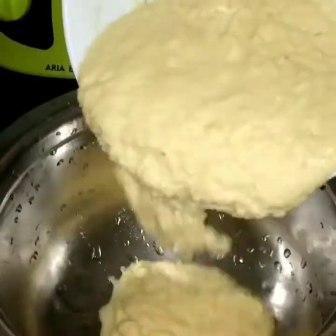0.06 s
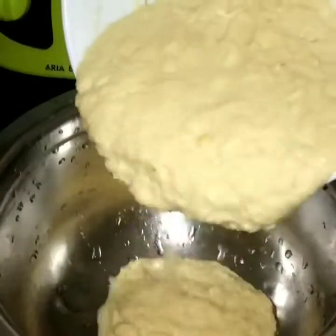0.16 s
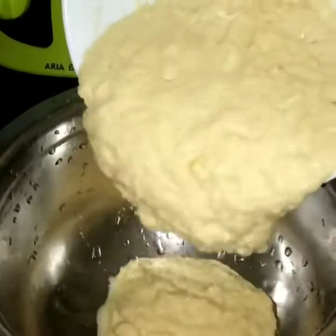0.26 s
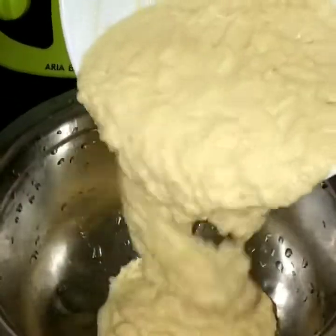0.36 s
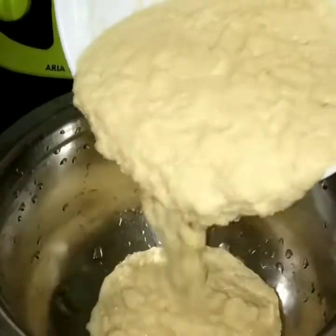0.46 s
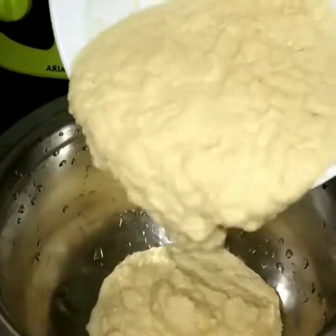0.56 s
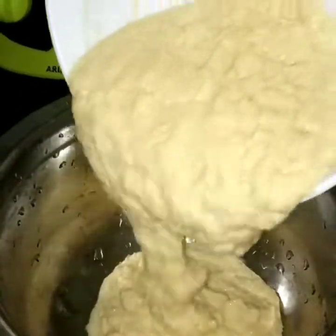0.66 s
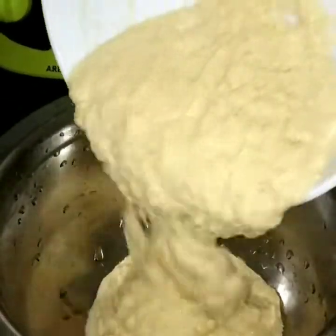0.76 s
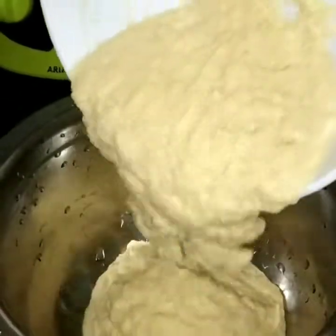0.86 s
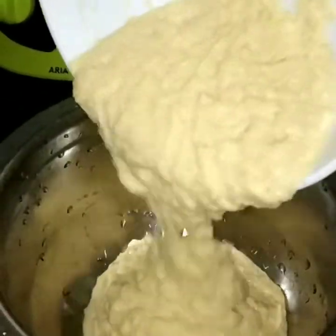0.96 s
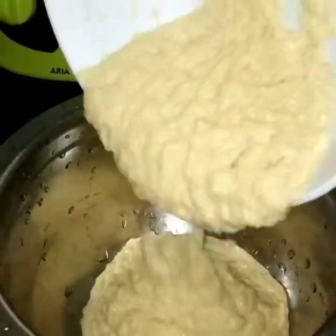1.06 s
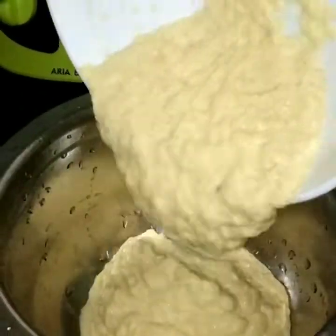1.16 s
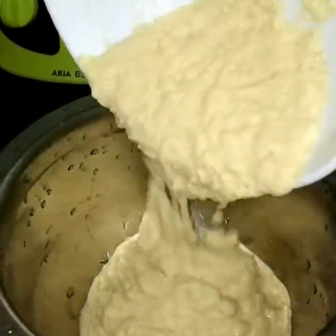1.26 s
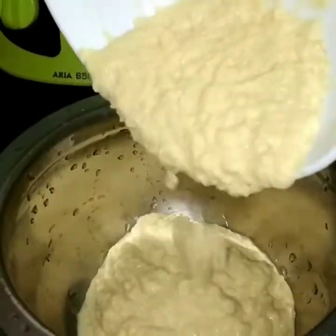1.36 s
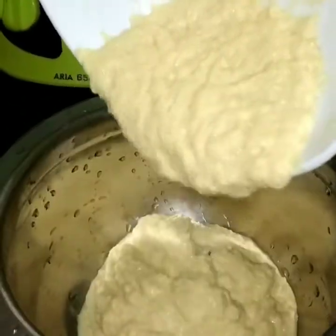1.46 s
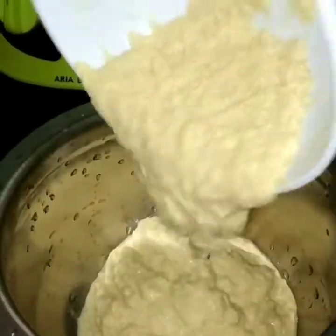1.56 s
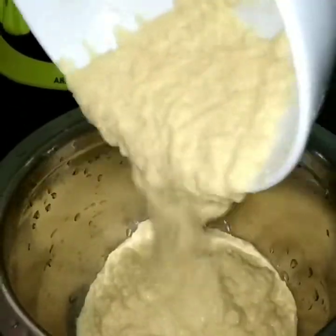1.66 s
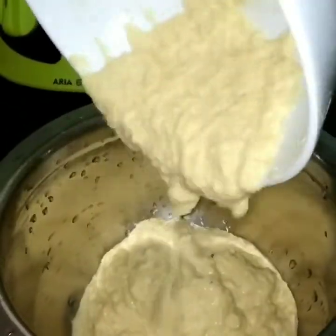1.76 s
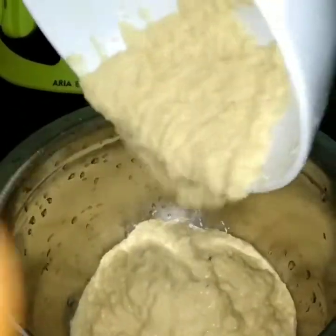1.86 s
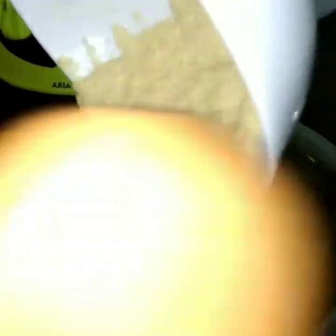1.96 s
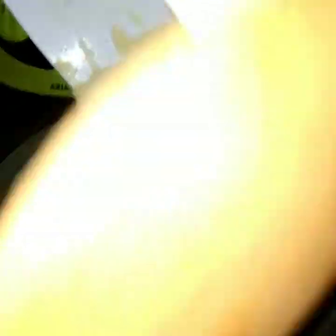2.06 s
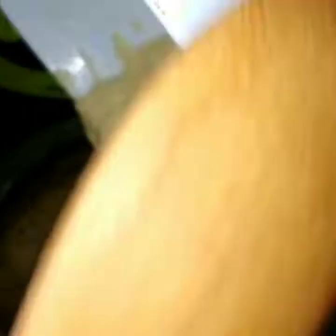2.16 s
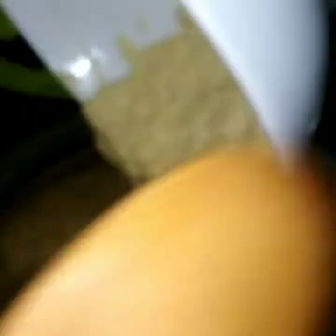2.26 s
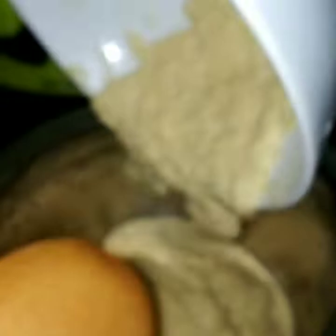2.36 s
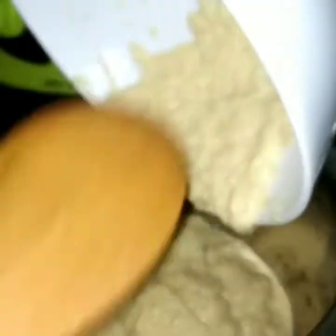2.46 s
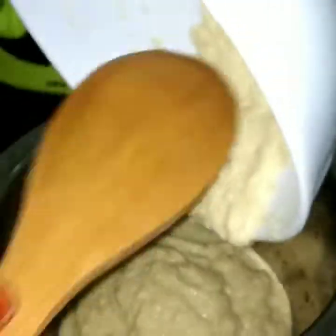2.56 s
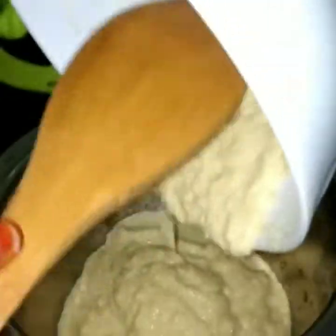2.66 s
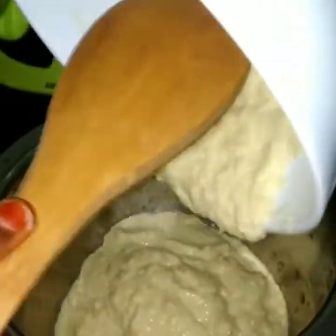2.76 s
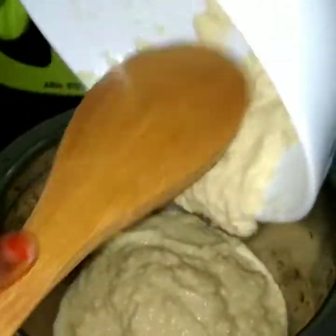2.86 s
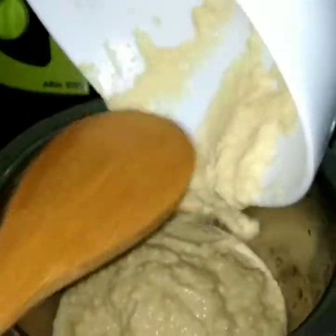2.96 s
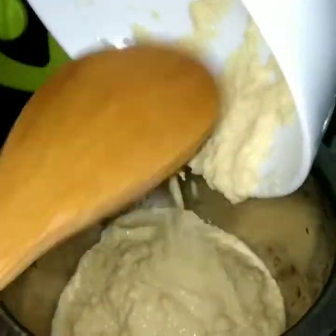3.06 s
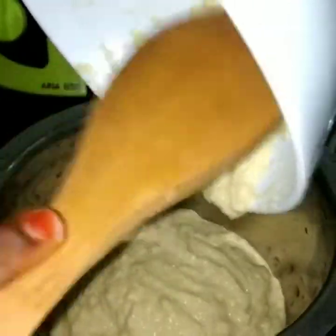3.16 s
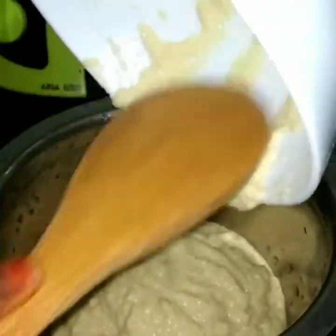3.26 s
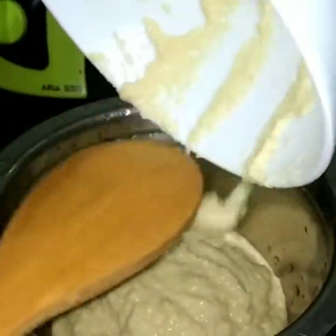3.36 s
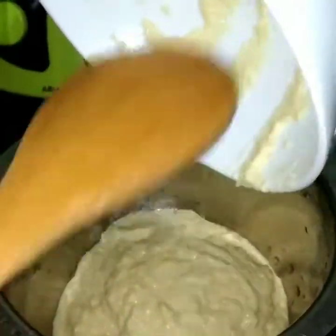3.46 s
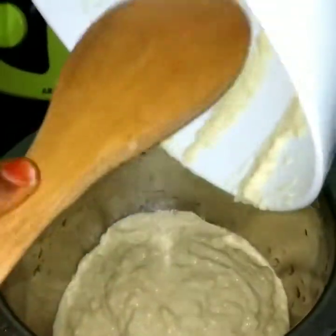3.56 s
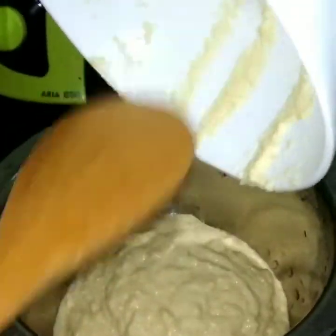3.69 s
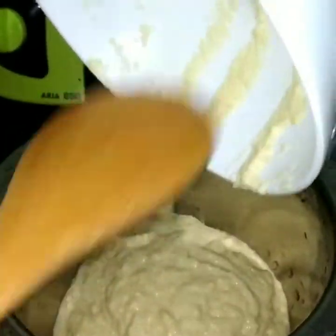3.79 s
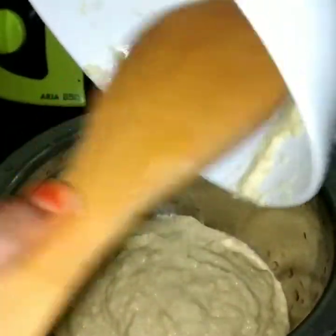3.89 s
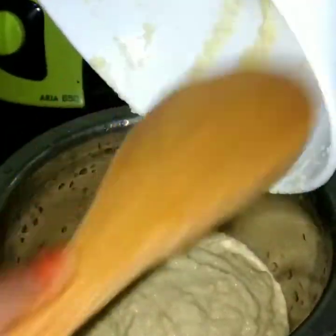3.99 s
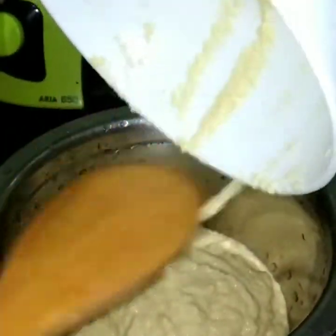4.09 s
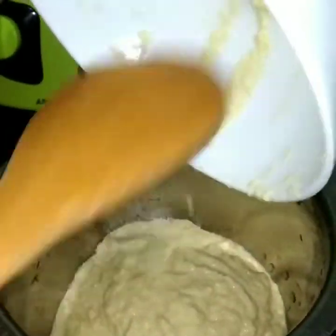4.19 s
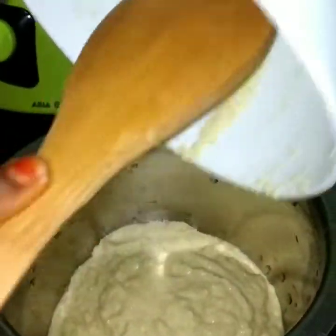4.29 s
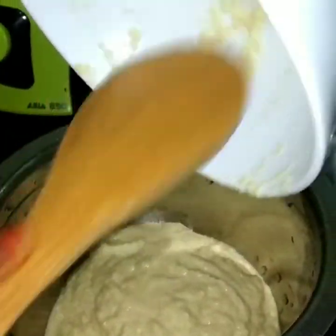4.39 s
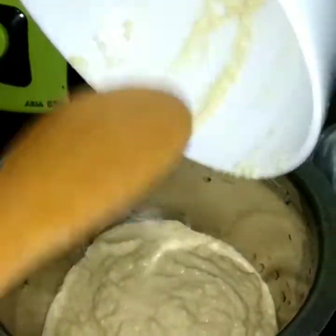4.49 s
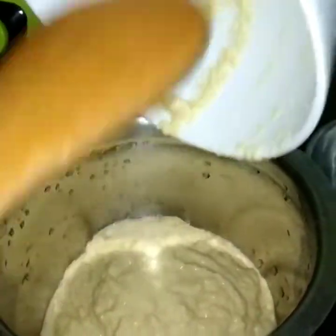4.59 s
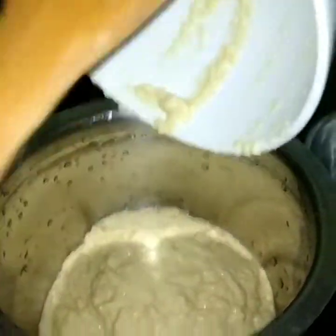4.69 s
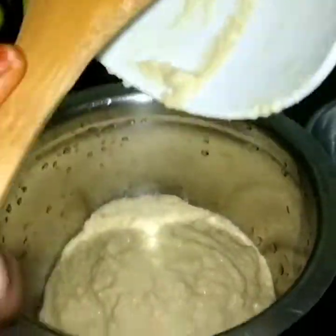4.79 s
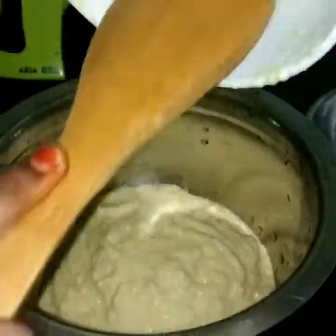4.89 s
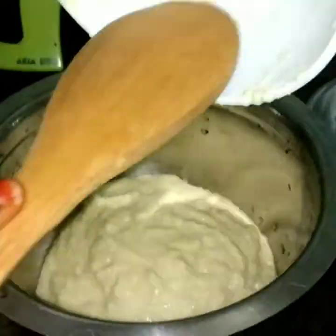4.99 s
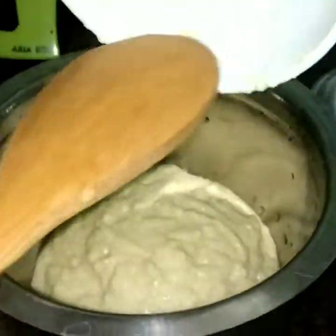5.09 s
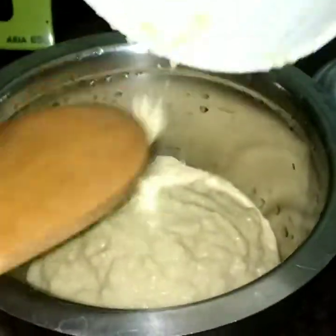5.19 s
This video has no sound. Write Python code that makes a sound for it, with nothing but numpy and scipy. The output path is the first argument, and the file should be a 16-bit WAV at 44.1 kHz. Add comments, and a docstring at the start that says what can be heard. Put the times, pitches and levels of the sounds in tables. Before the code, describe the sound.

Thick batter slides and plops softly into a steel pot, then a wooden spoon knocks sharply on a plastic bowl seven times, with faint crickets.

```python
"""Thick batter slides from a plastic bowl into a steel pot, with sticky smacks as it tears free and
soft plops as lumps land. Then a wooden spoon scrapes the bowl and knocks on it; the pot rings along
and the hard kitchen walls echo. A low drone fills the room, and outside a near and a far cricket
chirp by rubbing their wings. A phone's two microphones hear it all."""
import sys
import numpy as np
from scipy import signal
from scipy.fft import rfft, irfft, next_fast_len
from scipy.io import wavfile
from scipy.ndimage import uniform_filter1d, map_coordinates

SR = 44100
rng = np.random.default_rng(int(sys.argv[2]) if len(sys.argv) > 2 else 0)


def store_wav(level_fs):
    """Save 16-bit WAV to argv[1]."""
    pcm = np.round(np.clip(np.atleast_2d(level_fs), -1, 1) * 32767)
    wavfile.write(sys.argv[1], SR, pcm.T.astype(np.int16))


N = 230917

# How alike left and right sound (1 = the same): pitch_hz, likeness
LIKENESS = [(60, 0.93), (180, 0.98), (550, 0.61), (1650, -0.16), (4970, -0.000053), (15000, -0.052)]
SNAP_RISE_S = 0.0034


def batter_smacks():
    """Batter tears free in quick smacks; slow peels and spoon wipes make softer swishes."""
    # Smacks: start_s, spit_db, hiss_db, body_db, puff_over_snap_db, left_over_right_db
    smacks = [(0.0348, -42.5, -44.5, -47.5, -6, 5), (0.174, -42.5, -59, -49.5, -7, 6.5),
              (0.397, -44.5, -48, -50, -3, 4), (0.5003, -51, -53, -43, 2.5, 7.5),
              (0.795, -40.5, -54, -41, -18, 9), (0.832, -37, -58, -68, -20, 10.5),
              (0.9648, -45.5, -51, -66, -3.5, 6), (1.2262, -25, -30, -41.5, -20, 9.5),
              (1.2302, -29, -21, -33.5, -15, -5), (1.28, -51, -53, -43.5, 2.5, 0),
              (1.3126, -45, -43, -42, 4.5, 1), (1.6417, -50, -47, -47, -11, 7),
              (1.6974, -49, -56, -55, -7, 8), (1.779, -46, -47, -65, -14, 2),
              (1.9103, -35, -30.5, -38.5, -21, 9), (2.514, -35, -41.5, -53, -19, 10),
              (2.579, -52.5, -67, -51, 2, 12), (2.6935, -40.5, -44, -50, -11, -2),
              (2.822, -49, -49.5, -48, 4.5, 0), (3.0673, -41.5, -41, -47, 3, 4.5),
              (3.086, -34, -30, -42, -23, -2), (3.216, -41, -43, -44, -1.5, 0),
              (3.3506, -39.5, -46, -37, -18, 4), (3.461, -34, -32.5, -34, -6.5, 0.5),
              (4.087, -38.5, -59, -44, -17, 5), (4.2547, -28, -33, -36, -11.5, 8),
              (5.1159, -41.5, -43, -44.5, -6, -2)]
    # Wipes and peels: start_s, spit_db, hiss_db, fade_s (the time to fall by 60 dB)
    wipes = [(1.883, -42, -38, 0.21), (3.33, -41, -58, 0.086), (3.6, -44.5, -42, 0.46),
             (3.699, -44.5, -49, .12), (4.047, -43, -45.5, 0.23), (4.399, -45.5, -41, 0.22),
             (4.78, -42.5, -44, 0.49), (4.898, -54.5, -52.5, 0.75), (5.085, -40, -47, 0.11)]
    # Tone of a smack's bright spit, high hiss and wet body: pitch_hz, level_db
    spit_tone = [(1180, -50), (2000, -12), (4690, -1.5), (5060, -3.5), (5750, -3), (6210, 0), (7500, -7.5),
                 (9750, -14), (16500, -120)]
    hiss_tone = [(4410, -39), (7500, -2), (11800, 0.5), (13200, 0), (15100, 1), (16000, 10.5)]
    body_tone = [(350, 9), (550, -16.5), (690, 6), (850, -8), (1200, -8.5), (1400, 7.5), (1700, -6),
                 (3000, -9)]
    start_s, spit_db, hiss_db, body_db, puff_db, pan_db = np.transpose(smacks)
    wipe_s, wipe_spit_db, wipe_hiss_db, fade_s = np.transpose(wipes)
    when, size = rng.random((round(3 * N / SR), 2)).T  # faint random smacks, about three a second
    ticks = tears(when * N / SR, -60 + 3 * (2 * size - 1), puff_db=-7)
    layers = [(spit_tone, spit_db, wipe_spit_db), (hiss_tone, hiss_db, wipe_hiss_db)]
    sound = np.zeros((2, N))
    for tone, level_db, wipe_db in layers:
        tearing = np.array([tears(start_s, level_db + side * pan_db / 2, puff_db) for side in (1, -1)])
        wiping = swells(wipe_s, wipe_db, rise_s=0.02, fade_s=fade_s)
        sound += (tearing + wiping + ticks) * noise(tone, crackle_db=2.5, crackle_hz=800)
    body = swells(start_s - SNAP_RISE_S / 2, body_db, SNAP_RISE_S, fade_s=0.076) * noise(body_tone)
    return sound + body


def tears(start_s, level_db, puff_db):
    """The loudness of tearing batter: a quick snap and a slower puff that peak together."""
    puff_rise_s = 0.014
    peak_s = start_s + SNAP_RISE_S / 2
    snap = swells(peak_s - SNAP_RISE_S, level_db, SNAP_RISE_S, fade_s=0.013)
    puff = swells(peak_s - puff_rise_s, level_db + puff_db, puff_rise_s, fade_s=0.17)
    return snap + puff


def batter_plops():
    """Lumps land in the pot with a low, hollow sound."""
    # Landings: start_s, level_db, fade_s
    plops = [(0.561, -49.5, 0.61), (1.275, -44, 0.32), (1.31, -39, 0.65), (2.86, -53, 0.21)]
    # Tone of a plop: pitch_hz, level_db
    hollow_tone = [(70, -30), (110, -12), (135, 8.5), (160, -5), (195, -1), (280, -9.5), (380, -13.5),
                   (600, -37)]
    start_s, level_db, fade_s = np.transpose(plops)
    return swells(start_s, level_db, rise_s=0.011, fade_s=fade_s) * noise(hollow_tone)


def batter_slide():
    """Batter fizzes and rasps as it slides and is then dragged by the spoon."""
    # Loudness of the sliding: time_s, level_db
    slide = [(0, -53.5), (.5, -56.5), (2.3, -55.5), (2.68, -52), (3.1, -55), (3.3, -46.5), (3.55, -52),
             (3.75, -55.5), (4.3, -58), (4.85, -56), (5.24, -56)]
    # Tone of the high fizz and the lower rasp: pitch_hz, level_db
    fizz_tone = [(3530, -66), (6000, -9.5), (6410, -4), (6980, -4), (10300, -3), (14800, -7), (16000, -3)]
    rasp_tone = [(880, -66), (1500, -1.5), (2360, 1.5), (2860, 3), (5200, -1.5), (6350, 4.5), (7000, -25),
                 (9100, -53), (15400, -120)]
    slide_db = over_time(slide) + 1.5 * wobble(40)
    fizz = amp(slide_db - 1) * sides(-2.4) * noise(fizz_tone, crackle_db=1.2, patchy_db=1.3)
    rasp = amp(slide_db + 0.4) * sides(4.8) * noise(rasp_tone, crackle_db=0.3, patchy_db=3.0)
    return fizz + rasp


def spoon_knocks():
    """Each knock cracks on the bowl, rings bowl and pot, buzzes the thin rim and shakes the worktop."""
    # Knocks: start_s, thud_db, note_db, clack_db, clack_hz, low_pitch_ratio, high_pitch_ratio,
    # ring_s, crack_db, left_over_right_db
    knocks = [(3.1804, -16, -9.5, -23, 1520, 1.02, 0.96, 0.01, -36, -3),
              (3.5831, -15, -10.5, -19, 1380, 0.97, 0.98, 0.0071, -44, -1),
              (3.9104, -10.5, -9.5, -6.5, 1504, 1.03, 0.94, 0.01, -25, 3.5),
              (4.2864, -9, -20.5, -1, 1730, 1.01, 0.98, 0.0089, -19, -2),
              (4.3881, -17.5, -7.5, -4, 1630, 0.94, 1.045, 0.0091, -32, 2.5),
              (4.6891, -9, -21.5, -4.5, 1397, 1.14, 1.03, 0.0079, -27, -4),
              (4.8490, -16.5, -4, -9, 1415, 1.18, 1, 0.0051, -36, -0.5)]
    # Tone of the crack and the buzz: pitch_hz, level_db
    crack_tone = [(1500, -28), (2300, -4), (2800, 7), (3600, 2), (4300, 0), (6000, -7.5), (8000, -14),
                  (15000, -30)]
    t = np.arange(SR // 2) / SR
    direct, echoes = np.zeros((2, 2, N + 2 * SR))
    starts_s, thuds_db, *_, cracks_db, _ = np.transpose(knocks)
    crackle = noise(crack_tone, crackle_db=2.5, crackle_hz=400)
    buzz = swells(starts_s, cracks_db - 15, rise_s=0.0013, fade_s=0.36) * crackle
    contact = (1 - np.exp(-t / .0003)) * amp(-60 * t / .013)
    for start_s, *blow, ring_s, crack_db, pan_db in knocks:
        i = round(start_s * SR)
        soft_landing = 1 - np.exp(-t / (0.17 * ring_s))  # batter coats the wood
        choke = 1 / (1 + (t / ring_s) ** 4)  # the spoon stays pressed on and stops the ring
        bowl = soft_landing * choke * bowl_ring(t, *blow)
        crack = amp(crack_db) * contact * crackle[0, i - len(t):i]
        direct[:, i:i + len(t)] += sides(pan_db) * (bowl + soft_landing * pot_ring(t) + crack)
        echo = kitchen_echo(bowl[:SR // 8])
        echoes[:, i:i + echo.shape[1]] += echo
    jolt_s = 0.0019  # a short push on the worktop under the phone
    jolt = swells(starts_s, thuds_db - 31, rise_s=jolt_s, fade_s=4 * jolt_s) * sides(5)
    return filtered(jolt, lambda hz: hz > 18) + through_air(direct[:, :N], echoes[:, :N] + buzz)


def bowl_ring(t, thud_db, note_db, clack_db, clack_hz, low_ratio, high_ratio):
    """A blow's force (a thud, a note and a clack) rings the bowl; the grip bends the pitches a little."""
    # The bowl's own notes: pitch_hz, level_db, fade_s
    bowl_notes = [(257, 2, 0.032), (429, 0, 0.11), (636, 4, 0.042), (1001, 5, 0.02), (1146, -3, 0.047),
                  (1406, -5.5, 0.031), (1590, 5, 0.01), (1870, 6, 0.0093)]
    parts = [(thud_db, 242, 14.9), (note_db, 874, 58.5), (clack_db, clack_hz, 191)]
    ring = np.zeros_like(t)
    for hz, level_db, fade_s in bowl_notes:
        force = sum(amp(db - steepness * np.log2(hz / mid_hz) ** 2) for db, mid_hz, steepness in parts)
        bend = low_ratio if hz < 500 else high_ratio if hz > 800 else 1
        ring -= force * amp(level_db - 60 * t / fade_s) * np.sin(2 * np.pi * hz * bend * t)
    return ring


def pot_ring(t):
    """The steel pot rings along faintly, a little differently each time."""
    # The pot's own notes: pitch_hz, level_db, fade_s
    pot_notes = [(545, 1.5, 0.29), (613, -41, .3), (665, -8.5, 0.63), (892, -7, 0.24)]
    ring = np.zeros_like(t)
    for hz, level_db, fade_s in pot_notes:
        loudness = amp(level_db - 37 + rng.normal(0, 2.0) - 60 * t / fade_s)
        ring += loudness * np.sin(2 * np.pi * (hz * t + rng.random()))
    return ring


def through_air(direct, spread):
    """The small bowl gives off little bass, and reaches two microphones that face different ways."""
    # How far the left wave runs ahead of the right: pitch_hz, lead_radians
    left_lead = [(100, -0.5), (700, 1.39), (1100, -1.5), (1550, -2), (2600, -1.23), (4200, -6),
                 (16000, -40)]
    # How much louder the left side is: pitch_hz, left_over_right_db
    balance = [(60, 41), (150, -2.5), (380, 0), (950, 0), (2380, 7), (5980, 1), (15000, -19)]
    opposite = np.array([[1], [-1]])
    heard = filtered(direct, lambda hz: np.exp(.5j * at_pitch(left_lead, hz) * opposite)) + spread

    def gain(hz):
        ratio = hz / 185  # the bass drops away below about 185 Hz
        bass_cut = (amp(-13) - ratio ** 2 / (1 + 1.1j * ratio - ratio ** 2)) ** 2
        return amp(at_pitch(balance, hz) / 2 * opposite) * bass_cut
    return filtered(heard, gain)


def kitchen_echo(sound):
    """Hard walls throw back a wash of sound in which each pitch fades at its own speed."""
    # How long the echo lasts: pitch_hz, fade_s
    echo_fades = [(150, 0.86), (300, 0.47), (700, 0.57), (1400, 0.55), (2500, 0.58), (5000, 0.19),
                  (12000, .25)]
    # Tone of the echo: pitch_hz, level_db
    echo_tone = [(120, -25), (250, -4), (600, -0.5), (1000, -9), (1800, -4), (3000, -10), (8000, -30)]
    hz, t, bands = signal.stft(rng.standard_normal((2, SR)), SR, nperseg=256)
    hz = hz[:, None]
    alike, fade_s = at_pitch(LIKENESS, hz), at_pitch(echo_fades, hz)
    bands[1] = alike * bands[0] + np.sqrt(1 - alike ** 2) * bands[1]
    fading = amp(at_pitch(echo_tone, hz) - 60 * t / fade_s) / np.sqrt(fade_s)
    tail = signal.istft(bands * fading, SR, nperseg=256)[1] / np.sqrt(SR / 14)
    delayed = np.pad(sound, (250, 0))
    return signal.fftconvolve(delayed[None], tail, axes=1)


def crickets():
    """A near cricket rubs its wings about 52 times a second; a far one chirps faster and fainter."""
    # The near cricket's chirps: start_s, level_db
    chirps = [(0.288, -45.5), (.85, -47), (1.49, -47.5), (2.112, -46), (2.69, -44.5), (3.38, -48),
              (3.97, -50), (4.46, -47), (5.099, -46.5)]
    # Tone of the wings: pitch_hz, level_db
    wing_tone = [(5900, -37), (6150, -10), (6360, 7), (6550, 4), (6800, -24)]
    strokes = .5 + .5 * np.cos(2 * np.pi * np.cumsum(52 + 4 * wobble(5)) / SR)
    near = swells(*np.transpose(chirps), rise_s=0.021, fade_s=0.33, hold_s=0.047)
    near *= unit_level(.45 + .55 * strokes ** 2)
    far_pulse = np.cos(2 * np.pi * 6.8 * (np.arange(N) / SR - .085))
    far = amp(-60.5 + 5.1 * far_pulse + 1.5 * wobble(3))
    return (near + far) * noise(wing_tone)


def room_drone():
    """A low boom, a rumble and a soft hush fill the room; the pot hums along and at times rings."""
    # Loudness of the boom, which the rumble follows: time_s, level_db
    boom_levels = [(0, -50), (1.5, -49), (2.4, -52.5), (2.8, -55), (3.1, -51.5), (3.5, -57), (3.85, -57.5),
                   (4.2, -50), (5.24, -53)]
    # The pot's hum swells and rings briefly with the louder smacks and a knock: start_s, level_db
    pot_rings = [(1.228, -46.5), (2.51, -52.5), (3.072, -44.5), (3.46, -41.5), (4.4, -34)]
    # Tone of each layer: pitch_hz, level_db
    boom_tone = [(120, -61), (200, -8.5), (226, -26), (245, -1), (264, -1), (319, -1), (361, -9),
                 (420, -13), (550, -52), (920, -120)]
    rumble_tone = [(15, -54), (25, -18), (54, -25), (92, -9), (124, -3.5), (172, 0), (205, -1), (220, 0.5),
                   (290, -6), (480, -120)]
    hush_tone = [(220, -6), (380, -15.5), (529, -2), (662, -3), (974, -5), (1250, -7.5), (1380, -8.5),
                 (1560, -11), (1920, -12.5), (2400, -14.5), (3120, -13), (5280, -120)]
    hum_tone = [(600, -13), (640, -20.5), (660, 5.5), (685, -18.5), (730, -56)]
    boom_db, hush_db = over_time(boom_levels), -55
    hush = amp(hush_db + .8 * wobble(6)) * noise(hush_tone, patchy_db=1.5)
    ringing = swells(*np.transpose(pot_rings), rise_s=0.0066, fade_s=0.32)
    hum = (amp(hush_db - 9.5 + 2.5 * wobble(3)) + ringing) * noise(hum_tone)
    rumble = amp(boom_db - 9.5 + 2.2 * wobble(4.99)) * noise(rumble_tone)
    boom = amp(boom_db + 1.2 * wobble(14)) * noise(boom_tone)
    return boom + rumble + hush + hum


def noise(tone, crackle_db=0., crackle_hz=300, patchy_db=0.):
    """Stereo noise at level 1; crackle makes all of it flutter, patchy makes some bands come and go."""
    closed_tone = [(tone[0][0] * .8, -120), *tone, (tone[-1][0] * 1.2, -120)]  # silent past both ends
    bands = signal.stft(rng.standard_normal((2, N)), nperseg=512)[2]
    patches = uniform_filter1d(rng.standard_normal(bands.shape[1:]), size=5, axis=0)
    patches = unit_level(uniform_filter1d(patches, size=6, axis=1))
    pair = signal.istft(bands * amp(patchy_db * patches), nperseg=512)[1][:, :N]
    pair *= amp(crackle_db * wobble(crackle_hz))

    def gain(hz):
        width = np.arccos(at_pitch(LIKENESS, hz)) / 2
        return amp(at_pitch(closed_tone, hz)) * [np.cos(width), np.sin(width)]
    middle, side = filtered(pair, gain)
    return unit_level(np.array([middle + side, middle - side]))


def swells(start_s, level_db, rise_s, fade_s, hold_s=0.):
    """A loudness curve: from each start it rises, holds, then falls by 60 dB over fade_s."""
    curve = np.zeros(N + 4 * SR)
    for start, db, rise, fade in np.broadcast(start_s, level_db, rise_s, fade_s):
        t = np.arange(int((rise + hold_s + fade) * SR) + 2) / SR
        rising = np.clip(t / rise, 0, 1) ** 2
        falling = amp(db - 60 * np.clip(t - rise - hold_s, 0, None) / fade)
        curve[max(round(start * SR), 0):][:len(t)] += rising * falling
    return curve[:N]


def wobble(rate_hz):
    """A smooth random curve through rate_hz points a second."""
    points = rng.standard_normal(int(N * rate_hz / SR) + 4)
    return map_coordinates(points, [np.arange(N) * rate_hz / SR])


def filtered(sound, gain):
    """Scale and shift each pitch in the sound by gain(hz)."""
    size = next_fast_len(N + SR // 2)
    return irfft(rfft(sound, size) * gain(np.fft.rfftfreq(size, 1 / SR)), size)[..., :N]


def at_pitch(table, hz):
    """Read between the rows of a (pitch_hz, value) table, on a scale of octaves."""
    pitch_hz, values = np.transpose(table)
    return np.interp(np.log(hz + 1), np.log(pitch_hz + 1), values)


def over_time(table):
    """Read a (time_s, value) table at every sample."""
    return np.interp(np.arange(N) / SR, *np.transpose(table))


def sides(db):
    """Left and right gains, with the left louder by db."""
    return amp([[db / 2], [-db / 2]])


def amp(db):
    """Turn decibels into a gain."""
    return 10 ** (np.asarray(db) / 20)


def unit_level(sound):
    """Scale to an average (rms) level of 1."""
    return sound / np.sqrt(np.mean(sound ** 2) + 1e-20)


def scene():
    """All the sources together, in stereo."""
    return spoon_knocks() + batter_smacks() + batter_plops() + batter_slide() + crickets() + room_drone()


def record(dry):
    """The phone rounds off the highest peaks and drops the very top of the treble."""
    ceiling, top_hz = .95, 15900
    rounded = dry / (1 + np.abs(dry / ceiling) ** 6) ** (1 / 6)
    return filtered(rounded, lambda hz: hz < top_hz)


dry = scene()
out = record(dry)
store_wav(out)
```